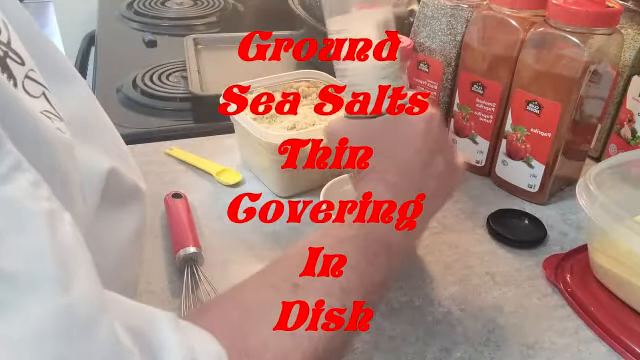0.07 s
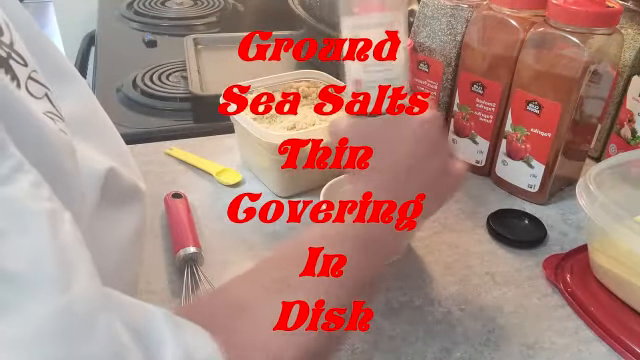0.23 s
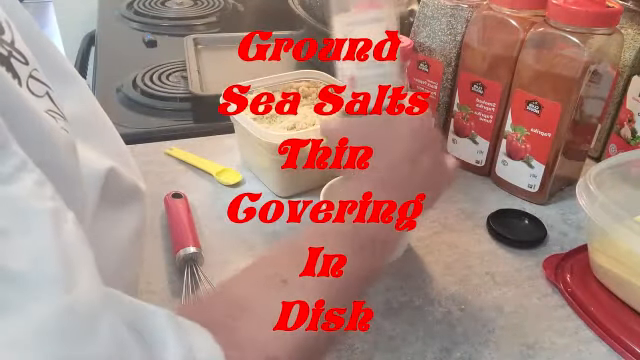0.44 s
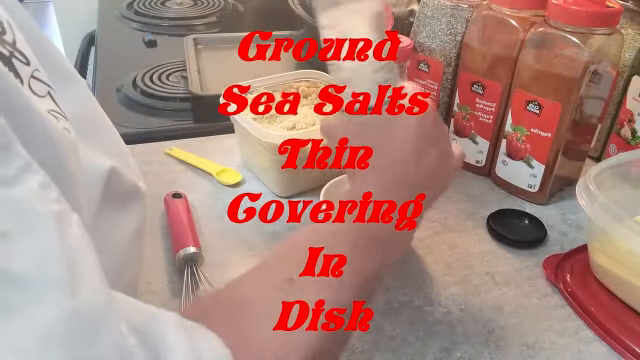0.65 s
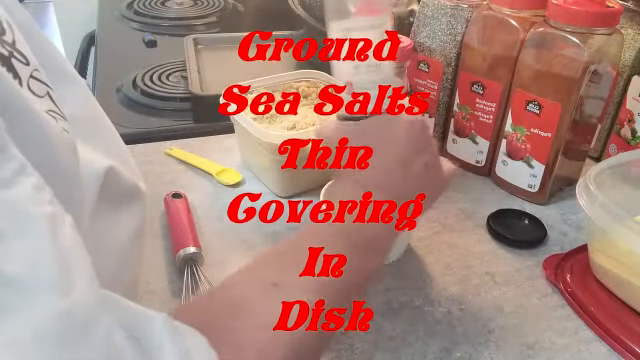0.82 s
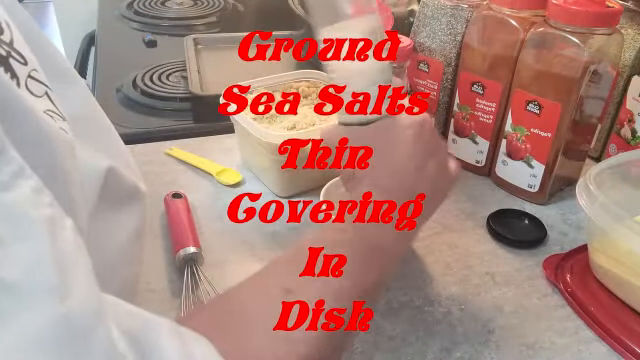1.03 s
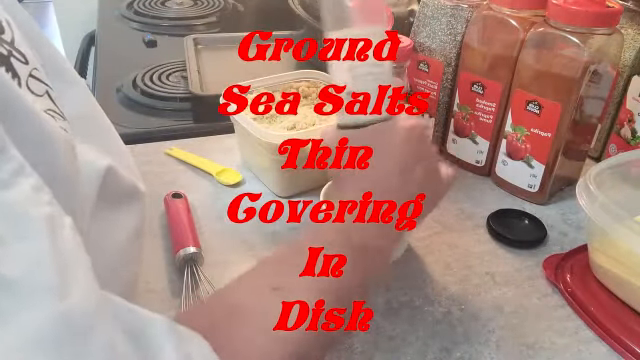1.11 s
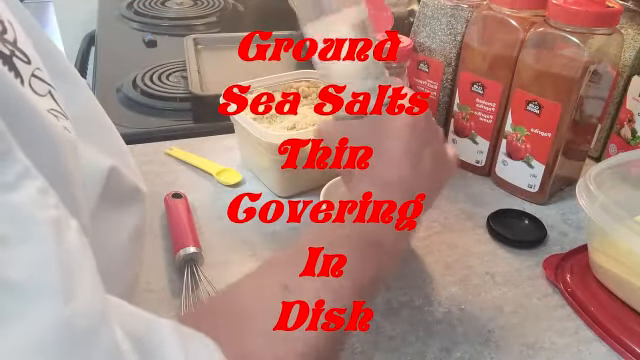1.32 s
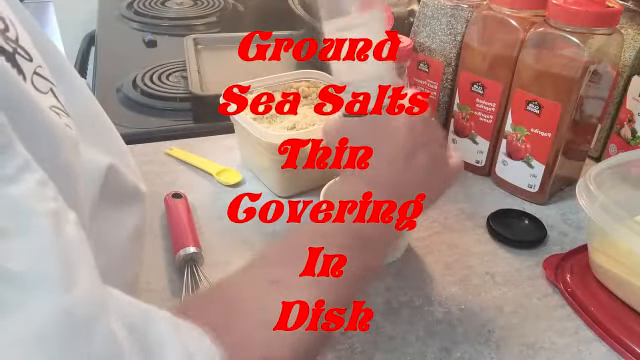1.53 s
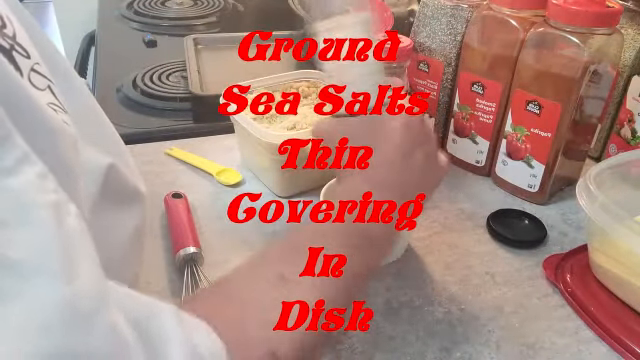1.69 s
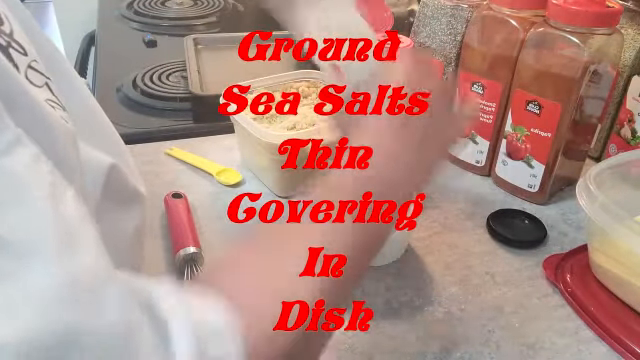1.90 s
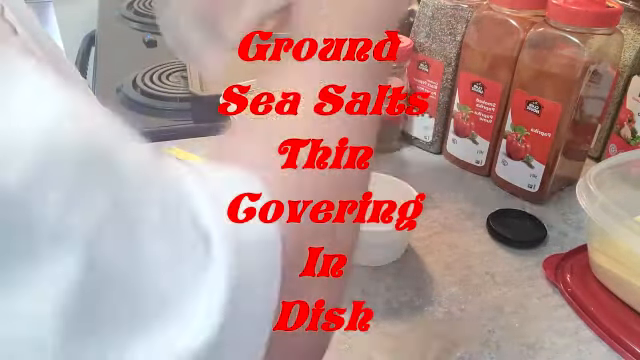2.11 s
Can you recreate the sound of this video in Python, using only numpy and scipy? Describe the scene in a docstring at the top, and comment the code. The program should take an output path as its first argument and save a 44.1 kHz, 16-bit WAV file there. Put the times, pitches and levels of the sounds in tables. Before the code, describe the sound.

Close by in a kitchen, loose crystals rattle, then a grinder crunches salt in brisk regular twists, each with sharp cracks and a dull hand push, ending in soft sliding grains over faint room air.

```python
"""A light rattle of loose crystals, then a dense hard crackle: a hand grinder twisted to and fro over a dish
in a kitchen. Hard twists crush salt and ring the grinder body; lighter return turns rattle crystals. At the
end the grinder is tipped up and the salt slides inside it. Random clicks excite filters and body modes;
single cracks are noise bursts with a short note, hand thumps are swelling sines, kitchen air is soft noise."""
import sys
import numpy as np
from scipy import signal
from scipy.io import wavfile
from scipy.ndimage import uniform_filter1d

SR = 44100
rng = np.random.default_rng(int(sys.argv[2]) if len(sys.argv) > 2 else 0)


def int16_out(signal):
    """Quantize to a 16-bit WAV file."""
    q = np.round(np.clip(np.atleast_2d(signal).T, -1, 1) * 32767)
    wavfile.write(sys.argv[1], SR, q.astype(np.int16))


N = 94815

# Crackle curves, one list per movement; levels ahead of the room gain.
# Columns: time_s, mid_level_db, low_re_mid_db, high_re_mid_db
TWIST_CURVES = [
    [(0.185, -38, -20, -17), (0.193, -30.5, -13, -13), (0.203, -16.5, -14, -11), (0.249, -11.5, -18, -19.5),
     (0.265, -32, -8, 3), (0.3, -45, -13, -16)],
    [(0.48, -34, -15, -15), (0.494, -32, -1.5, -9), (0.526, -12.5, -10.5, -16), (0.556, -21, -19, -16),
     (0.564, -14.5, -34, -23), (0.584, -33.5, -5, -11), (0.61, -50, -27, 4)],
    [(0.79, -49, -22, -19), (0.796, -30.5, -45, -47), (0.808, -31.5, -4, -10), (0.822, -19.5, -26, -6),
     (0.84, -11.5, -6, -18), (0.862, -12, -4, -13), (0.92, -51.5, -25, 1)],
    [(1.115, -43, -10, -27), (1.131, -32.5, -10, -7), (1.169, -13, -14, -13.5), (1.191, -15, -11, -11.5),
     (1.217, -44, -20, -5), (1.24, -41, -13, -1)],
    [(1.44, -37.5, -23, -11), (1.466, -14, -17, -15.5), (1.504, -13, -9.5, -16), (1.53, -36.5, -20, -9),
     (1.57, -46, -12, 6)],
    [(1.765, -37, -11, -23), (1.785, -24.5, -4.5, -12), (1.825, -12, -11, -19), (1.841, -13.5, -19, -17),
     (1.873, -41.5, -8, -7), (1.92, -45, -33, -19)],
]  # hard twists
RETURN_CURVES = [
    [(0.0, -36.5, -17, -7), (0.016, -42.5, -10, -7), (0.024, -32.5, -10, -14), (0.09, -35.5, -17, -8.5),
     (0.108, -30.5, -9, -1), (0.144, -52, -33, -19), (0.16, -45, -1, 10)],
    [(0.3, -42, -19, -2), (0.328, -40, 0, -6), (0.333, -34.5, 6, 7), (0.364, -30.5, -25, -25),
     (0.386, -21, -4, -9.5), (0.402, -24, -43, -12.5), (0.444, -45.5, 1, -3), (0.46, -60, -18, 6)],
    [(0.61, -37, -3, -13), (0.63, -52, -16, -19), (0.65, -36, -10, -22), (0.66, -27, -6, -13.5),
     (0.682, -36.5, -9, -15), (0.744, -35, -19, -6), (0.78, -58, -14, -9)],
    [(0.93, -51, -20, -9), (0.963, -29.5, -6, -10), (0.968, -25.5, -14, -10), (1.0, -33, -10, -11),
     (1.022, -16.5, -29, -19), (1.03, -24.5, -33, -10.5), (1.064, -43.5, -17, -6), (1.09, -80, -17, -12)],
    [(1.25, -46.5, -7, -9), (1.284, -33.5, -8, -1), (1.3, -36.5, -15, -23), (1.304, -31.5, -10, -7),
     (1.328, -28.5, -9.5, -10.5), (1.388, -35, -10, -8), (1.396, -27, -17, -10.5), (1.43, -50, -11, 3)],
    [(1.58, -34, -6, -4), (1.594, -43.5, -20, -1), (1.61, -39, -11, -13), (1.69, -23.5, -28, -13.5),
     (1.702, -39.5, -35, -4), (1.738, -43.5, -32, -1.5), (1.76, -37.5, -33, -10)],
]  # return turns
SLIDE_CURVES = [
    [(2.0, -66, -18, -15), (2.03, -46, -15, -4), (2.056, -59, -18, -10), (2.061, -39, -28, -6),
     (2.075, -44, -32, 3), (2.079, -34.5, -35, -1.5), (2.098, -37, -44, -4), (2.116, -31, -17, -8),
     (2.15, -36.5, -30, -10)],
]  # salt sliding
# Single big crystals cracking: start_s, relative_level_db, low_body_re_level_db, note_hz
CRACKS = [(0.026, -27, 17, 1240), (0.064, -18, 3.5, 2450), (0.1, -14, -28, 3450), (0.1926, -15, 6, 1420),
          (0.196, -12, -11, 4700), (0.204, 3, -3, 1314), (0.21, 3, -22, 1500), (0.229, 0, 2.5, 1540),
          (0.256, -2, -28, 3150), (0.3325, -10, -1, 4140), (0.384, -4.5, -29, 4600),
          (0.393, -3, -8.5, 3120), (0.498, -8.5, 7, 1380), (0.521, 0.5, 7, 1550), (0.561, 4.5, -31, 4500),
          (0.657, -8, -7, 1230), (0.662, -11, 1.5, 1350), (0.718, -13, -12, 2300), (0.736, -15, -16, 1290),
          (0.813, -1, -2.5, 1250), (0.821, -5, 2, 1580), (0.841, 8, -12, 604), (0.859, -2, 10, 2440),
          (0.966, -14.5, -3, 3670), (0.982, -13.5, -23, 4550), (1.0195, -2, 3, 1294), (1.146, -8, -4, 2450),
          (1.163, -1, -25, 2260), (1.1722, 6.5, -12, 4290), (1.304, -8.5, 7, 1260), (1.315, -9, -13, 4860),
          (1.339, -8.5, -4, 2320), (1.38, -8.5, 0, 4800), (1.466, -2, 5, 1100), (1.492, -2, -6, 3300),
          (1.498, 4.5, -6, 1320), (1.6124, -13, -2, 3180), (1.648, -8, -8, 1390), (1.662, -7, -5, 4730),
          (1.687, -9.5, -1.5, 4460), (1.796, -7, -30, 2180), (1.821, 2.5, -10, 1340),
          (2.0095, -24, -27, 5350), (2.022, -24, -25, 5400), (2.037, -26, -25, 4000),
          (2.0758, -13, -21, 3500), (2.083, -12, -29, 3830), (2.109, -14, -12.5, 4270)]
# Low thumps of the pressing hands, carried through the counter: start_s, main_partial_peak_db, pitch_hz
THUMPS = [(0.199, -40.5, 197), (.24, -44.5, 113), (.375, -47.5, 139), (0.521, -38.5, 227), (.55, -53, 90.5),
          (0.651, -49.5, 189), (0.839, -36, 196), (0.862, -45.5, 127), (1.017, -50, 152),
          (1.141, -46.5, 150), (1.482, -34.5, 186), (1.826, -38, 168)]
# Modes of the grinder body: centre_hz, width_hz, tight_grip_db, loose_grip_db (relative levels)
BODY_MODES = [(380, 250, -22, -10.5), (616, 34, -18.5, -15), (799, 51, -22.5, -14.5), (966, 62, -11.5, -9),
              (1360, 275, 0.5, 0.5), (1557, 34, -8.5, -7), (1807, 93, -3.5, -4.5), (2347, 90, 2, -2),
              (2433, 74, 2, -2.5), (3046, 107, -2.5, 1), (3372, 37, 3, -1.5), (3680, 710, 4, -4.5),
              (4210, 66, -9, -8), (4484, 29, -0.5, -12), (4720, 32, -6, -0.5), (6080, 600, -1.5, -5.5)]
# Spectra of the bare crackle: frequency_hz, relative_gain_db
TWIST_COLOUR = [(35, -97), (60, -55), (268, -2.5), (621, -7), (882, -6), (1510, 0), (2090, -0.5),
                (2410, -29), (2770, -9), (4640, -0.5), (16000, -13.5)]
RETURN_COLOUR = [(35, -80), (60, -29), (698, -24), (1380, -3), (2000, -11), (2350, -7), (2710, -11),
                 (3850, -4.5), (4750, -6), (6740, -19.5), (16000, -37)]
SLIDE_COLOUR = [(35, -52), (60, -38), (1090, -20), (1340, -9), (2300, -10), (2520, -12), (4320, -4.5),
                (11800, -24), (16000, -36)]
# Grain settings: crystals_per_s, size_spread_db, ring_re_crackle_db, loose_grip (above 0.5 is loose)
TWIST_GRAIN = (6003, 3, 0, 0)
RETURN_GRAIN = (3000, 2.7, 2.1, 1)
SLIDE_GRAIN = (5995, 4, -12, -1)
# Room decay: frequency_hz, t60_s
ROOM_DECAY = [(250, 0.089), (700, 0.16), (1800, 0.19), (4600, 0.18), (12000, 0.19)]
# Spectrum of the kitchen air: frequency_hz, relative_gain_db
AIR_COLOUR = [(18, -17), (30, -8.5), (112, -4), (199, -6), (355, -2), (740, -4.5), (889, -6), (11700, -13),
              (16000, -19)]
# Microphone imbalance: frequency_hz, left_minus_right_db
SIDES = [(60, -3.5), (300, -0.6), (1500, -0.6), (3000, -1), (5500, 2.5), (9000, -1), (15000, -5)]

LOW_HZ, HIGH_HZ, RUMBLE_HZ = 900, 8000, 300  # crackle band splits and low-band high-pass
GRIP_S, GRIP_RMS_DB, GRIP_BEND_RMS = 0.026, 2, 0.018  # fingers shift mode level and pitch (share of Hz)
CRACK_DECAY_S, CRACK_DB, CRACK_LOW_HZ = 0.00059, -6.5, 380  # a single crystal has no bass
NOTE_DB, NOTE_T60_S, NOTE_ATTACK_S = -8, 0.014, 0.00025
THUMP_SWELL_S, UNDER_RATIO, UNDER_DB = 0.0082, 0.513, -5  # lower partial: pitch ratio, level
SHIFT_S, ROOM_GAIN_DB, TAIL_DB = 0.03, -6.5, -2
SCATTER_DECAY_S, SCATTER_DB = 0.002, 5  # dense reflections off hands, jars and counter
AIR_DB = -49
RIGHT_LAG_SAMPLES, EDGE_HZ = 1, 15750


def amp(db):
    """Decibels to amplitude ratio."""
    return 10 ** (np.asarray(db) / 20)


def evened(x):
    """Scale to unit RMS."""
    return x / np.sqrt(np.mean(x ** 2) + 1e-20)


def read(points, hz):
    """Interpolate a frequency table on a log axis."""
    f, value = np.transpose(points)
    return np.interp(np.log(hz + 1), np.log(f + 1), value)


def colour(x, points, share=1.):
    """Causal minimum-phase filter with the given share of a dB spectrum, floored at -100 dB before the share."""
    hz = abs(np.fft.fftfreq(4096, 1 / SR))
    log_gain = share * np.log(amp(np.maximum(read(points, hz), -100)))
    spectrum = np.exp(np.conj(signal.hilbert(log_gain)))
    impulse = np.fft.ifft(spectrum).real[:2048]
    return signal.oaconvolve(x, impulse)[:N]


def split(x, hz):
    """Parts below and above hz."""
    low = signal.sosfiltfilt(signal.butter(2, hz, fs=SR, output="sos"), x)
    return low, x - low


def crunch(curves, spectrum, crystals_per_s, spread_db, ring_db, loose):
    """Random crystal clicks follow the hand's level curves, heard bare and through the ringing body."""
    t = np.arange(N) / SR
    sizes = amp(spread_db * np.minimum(rng.exponential(1, N), 4))
    clicks = sizes * (rng.random(N) < crystals_per_s / SR)
    bare = evened(colour(clicks * rng.choice([-1., 1.], N), spectrum))
    sound = bare + amp(ring_db) * evened(ring(clicks, loose > .5))

    low, rest = split(sound, LOW_HZ)
    for _ in range(2):
        low = split(low, RUMBLE_HZ)[1]
    mid, high = split(rest, HIGH_HZ)
    low, mid, high = evened(low), evened(mid), evened(high)

    out = np.zeros(N)
    for curve in curves:
        time_s, mid_db, low_db, high_db = np.transpose(curve)
        gate = np.clip(np.minimum(t - time_s[0], time_s[-1] - t) / 0.011 + .5, 0, 1)  # 11 ms edges
        level_db = np.interp(t, time_s, mid_db)
        low_gain = amp(level_db + np.interp(t, time_s, low_db))
        high_gain = amp(level_db + np.interp(t, time_s, high_db))
        out += gate * (amp(level_db) * mid + low_gain * low + high_gain * high)
    return out


def ring(clicks, loose):
    """Each click strikes every body mode with its own random weight; the grip shifts balance and pitch."""
    out = np.zeros(N)
    for hz, width_hz, tight_db, loose_db in BODY_MODES:
        drift = uniform_filter1d(rng.standard_normal((2, N)), round(GRIP_S * SR))
        grip, bend = evened(uniform_filter1d(drift, 300))
        # rotating phasor shifts the mode to 0 Hz, where one pole sets its decay
        turn = np.exp(2j * np.pi * np.cumsum(hz * (1 + GRIP_BEND_RMS * bend)) / SR)
        mode_db = loose_db if loose else tight_db
        blows = clicks * rng.standard_normal(N) * amp(GRIP_RMS_DB * grip + mode_db)
        pole = np.exp(-np.pi * width_hz / SR)
        decay = signal.lfilter([np.sqrt(width_hz)], [1, -pole], blows / turn + 1e-18)
        out += (turn * decay).real
    return out


def struck(x):
    """Crack noise heard bare and through the loosely held body."""
    return amp(2.5) * colour(x, RETURN_COLOUR, 0.78) + amp(-46.0) * ring(x, 1)


def cracks():
    """A sharp splintering burst per crystal, ringing the body and one short note."""
    t = np.arange(600) / SR
    bright, deep, notes = np.zeros((3, N + 600))
    bursts = rng.standard_normal((len(CRACKS), len(t))) * np.exp(-t / CRACK_DECAY_S)
    bursts = bursts / np.linalg.norm(bursts, axis=1, keepdims=True) * np.sqrt(CRACK_DECAY_S * SR / 2)
    note_decay_db = t / NOTE_T60_S * 20 * np.log10(1e3)
    attack = np.minimum(t / NOTE_ATTACK_S, 1)
    for (start_s, db, low_db, hz), burst in zip(CRACKS, bursts):
        start = round(start_s * SR)
        at = slice(start, start + len(t))
        bright[at] += amp(db + CRACK_DB) * burst
        deep[at] += amp(db + CRACK_DB + low_db) * burst
        notes[at] += amp(db + NOTE_DB - note_decay_db) * np.sin(2 * np.pi * hz * t) * attack
    upper = split(struck(bright[:N]), 3100)[1]
    lower = split(struck(deep[:N]), 2420)[0]
    return upper + amp(8.0) * lower + notes[:N]


def thumps():
    """Short dull pushes: two swelling, dying sines, the same at both microphones."""
    t = np.arange(N) / SR
    out = np.zeros(N)
    for start_s, db, hz in THUMPS:
        since_s = np.maximum(t - start_s, 0)
        swell = since_s / THUMP_SWELL_S * np.exp(1 - since_s / THUMP_SWELL_S)
        main = np.sin(2 * np.pi * hz * since_s)
        under = np.sin(2 * np.pi * UNDER_RATIO * hz * since_s)
        out += amp(db) * swell * (main + amp(UNDER_DB) * under)
    return out


def kitchen(x, count=10):
    """The sound crossfades cyclically through several room responses as the hands move."""
    step = np.arange(N) / (SHIFT_S * SR)
    out = np.zeros((2, N))
    for k in range(count):
        window = np.clip(1 - abs((step - k + count / 2) % count - count / 2), 0, 1)
        part = (x * np.sqrt(window))[None]
        out += signal.fftconvolve(part, response(), axes=1)[:, :N]
    return amp(ROOM_GAIN_DB) * out


def response():
    """Direct sound, near scatter and a short sparse tail, different at each microphone."""
    taps = np.zeros((2, SR // 2))
    at = np.arange(300, SR // 2 - 20, 20)
    shape = (2, len(at))
    np.put_along_axis(taps, at + rng.integers(0, 20, shape), rng.choice([-1., 1.], shape), 1)
    hz, t, z = signal.stft(taps, SR, nperseg=256)
    decay = amp(-60 * t / read(ROOM_DECAY, hz)[:, None])
    tail = signal.istft(z * decay, SR, nperseg=256)[1]
    tail *= amp(TAIL_DB) / np.linalg.norm(tail, axis=1, keepdims=True)

    near = rng.standard_normal((2, 800)) * np.exp(-np.arange(800) / (SCATTER_DECAY_S * SR))
    near = near * (rng.random((2, 800)) < .15)
    near = signal.lfilter([1, -.6], 1, near)  # treble lift
    tail[:, 10:810] += amp(SCATTER_DB) * near / np.linalg.norm(near, axis=1, keepdims=True)
    tail[0, 0] += 1
    tail[1, RIGHT_LAG_SAMPLES] += 1
    return tail


def background():
    """Faint steady kitchen air: coloured noise, mostly shared by both microphones."""
    shared, left, right = rng.standard_normal((3, N))
    pair = np.array([colour(shared + 0.71 * own, AIR_COLOUR) for own in (left, right)])
    return amp(AIR_DB) * evened(pair)


def scene():
    """Grinder in the room, with hand thumps, over the background."""
    grinder = crunch(TWIST_CURVES, TWIST_COLOUR, *TWIST_GRAIN)
    grinder += crunch(RETURN_CURVES, RETURN_COLOUR, *RETURN_GRAIN)
    grinder += crunch(SLIDE_CURVES, SLIDE_COLOUR, *SLIDE_GRAIN)
    grinder += split(cracks(), CRACK_LOW_HZ)[1]
    return kitchen(grinder) + thumps() + background()


def record(dry):
    """Unequal microphones, clipping at full scale, band limit."""
    left = colour(dry[0], SIDES, .5)
    right = colour(dry[1], SIDES, -.5)
    pair = np.clip([left, right], -1, 1)
    band_limit = signal.firwin(1023, EDGE_HZ, window=("kaiser", 9), fs=SR)
    return signal.oaconvolve(pair, band_limit[None], "same")


dry = scene()
out = record(dry)
int16_out(out)
```